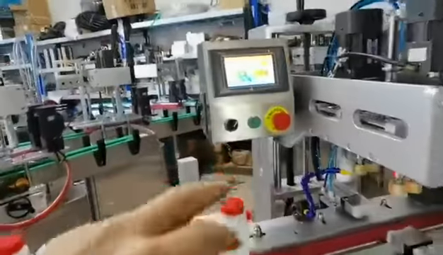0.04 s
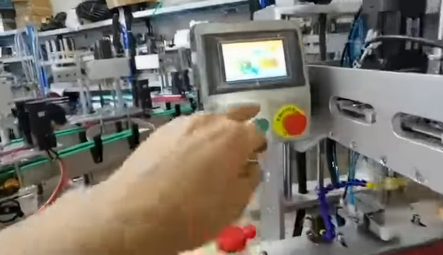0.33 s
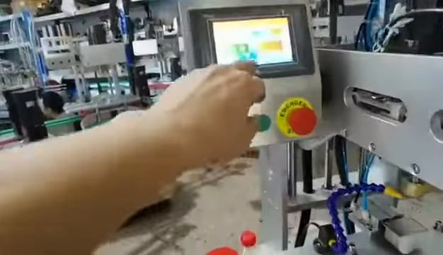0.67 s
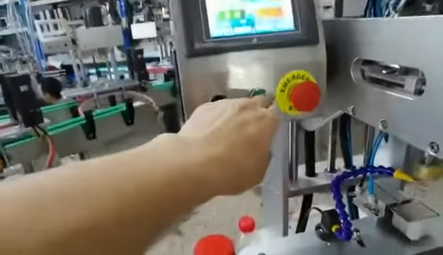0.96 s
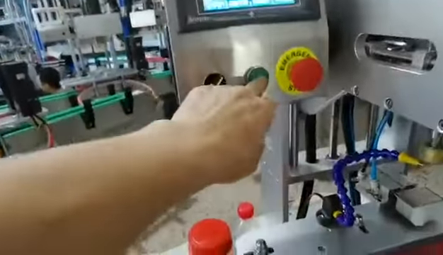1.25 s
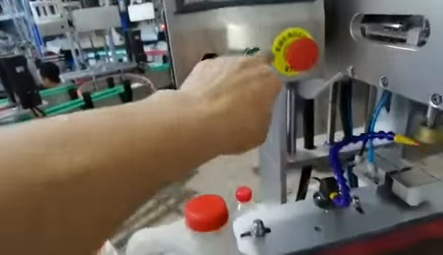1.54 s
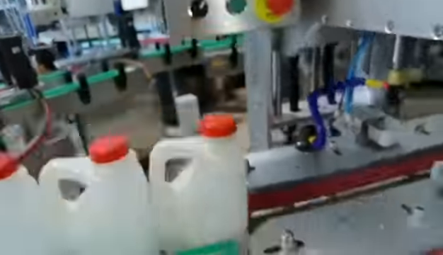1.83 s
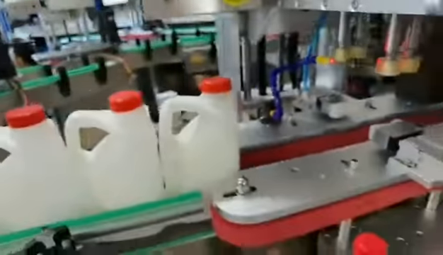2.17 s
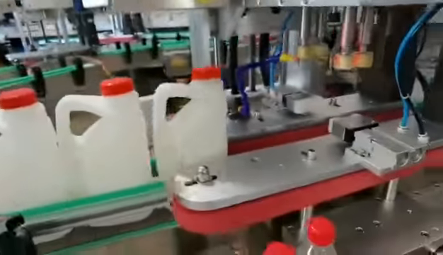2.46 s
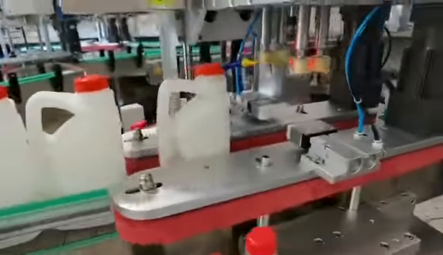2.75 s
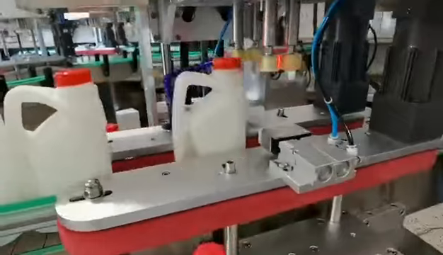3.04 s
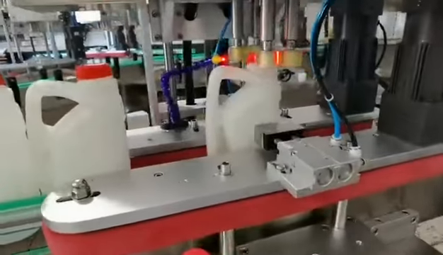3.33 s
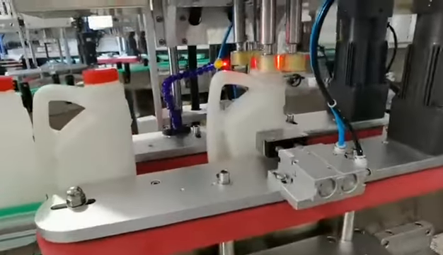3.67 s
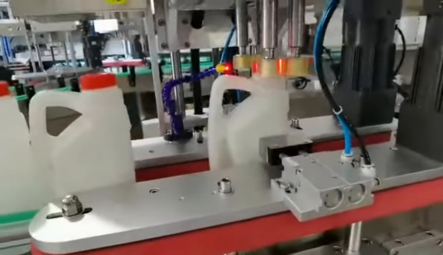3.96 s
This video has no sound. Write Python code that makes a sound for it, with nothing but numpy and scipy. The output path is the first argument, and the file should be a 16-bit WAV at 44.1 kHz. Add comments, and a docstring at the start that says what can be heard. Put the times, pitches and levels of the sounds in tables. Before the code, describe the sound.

A bottle capping machine whirrs and squeals twice, then hisses and clacks in a noisy workshop.

```python
"""Belts whirr and a conveyor rumbles at a bottle capping machine in a noisy workshop.
Twice the capping wheels spin up, ringing and squealing from friction; the drive hums in swells
and hollow bottles jostle. A button and switch clack after the first run. After the second,
air valves hiss, a clamp shuts on a bottle and the capping head clatters down."""
import sys
import numpy as np
from scipy import signal
from scipy.fft import rfft, irfft
from scipy.io import wavfile
from scipy.ndimage import uniform_filter1d

SR = 44100
rng = np.random.default_rng(int(sys.argv[2]) if len(sys.argv) > 2 else 0)


def transcribe(u):
    """Save the signal u as a 16-bit wav file named by the first command-line argument.

    u: samples, shape (n,) or (channels, n), limited to [-1, 1]; the rate is SR.
    q: integer samples, one column per channel.
    """
    v = np.clip(np.atleast_2d(u).T, -1, 1)
    q = np.round(v * 32767).astype(np.int16)
    wavfile.write(sys.argv[1], SR, q)


N = 176400
TIME = np.arange(N) / SR
BINS_HZ = np.fft.rfftfreq(N, 1 / SR)


def wheels():
    """Friction keeps the capping wheels' metal resonances ringing, with two squeals and a whine."""
    # wheel resonances: pitch_hz, half_width_hz, level_db, pan_db
    resonances = [(1810, 28, -7.5, -14.5), (2073, 50, -7.5, 3), (2253, 220, 1, -8), (2640, 200, -10, -3.5),
                  (3137, 42, -12.5, -15), (3730, 67, -11.5, -2.5), (4070, 51, -9.5, -0.5),
                  (4390, 280, -11, -4), (5596, 110, -14.5, -6), (6380, 50, -18.5, 14.5),
                  (7000, 350, -13, 8.5)]
    # envelopes of the ringing and the three tones: time_s, level_db
    ring_level = [(0, -68.5), (.55, -40.5), (.85, -39.5), (1.08, -33), (1.33, -35), (1.44, -33.5),
                  (2.3, -53), (2.55, -36), (2.9, -34.5), (3.14, -34), (3.26, -30), (3.42, -36.5),
                  (3.55, -46)]
    early_level = [(0, -53), (.65, -47.5), (.88, -41), (1.1, -39), (1.3, -51), (1.42, -57), (2.35, -58.5),
                   (2.39, -36.5), (2.7, -41), (3.15, -47), (3.25, -58)]
    late_level = [(.8, -64), (1.05, -42), (1.22, -40), (1.32, -29.5), (1.42, -59), (2.8, -58), (3.02, -49),
                  (3.09, -32), (3.16, -33), (3.3, -56)]
    whine_level = [(.8, -61), (1.1, -50), (1.32, -46), (1.4, -73), (2.6, -66), (2.95, -49), (3.18, -40),
                   (3.25, -62)]
    power = sum((amp(db) * pan(pan_db) * unit(peak(hz, half_width_hz))) ** 2
                for hz, half_width_hz, db, pan_db in resonances)
    rings = noise(np.sqrt(power)) * amp(0.53 * drift(rate_hz=33)) * level(ring_level)
    early = squeal(early_level, pitch_hz=2242, pan_db=-8.5)
    late = squeal(late_level, pitch_hz=2085, pan_db=-11)
    whine = squeal(whine_level, pitch_hz=3687, pan_db=6)
    return rings + early + late + whine


def squeal(envelope, pitch_hz, pan_db):
    """A wheel sticks and slips into one rough tone."""
    phase = 2 * np.pi * np.cumsum(pitch_hz * (1 + 0.00701 * drift(rate_hz=110))) / SR
    return unit(np.sin(phase) * amp(3.3 * drift(rate_hz=30))) * pan(pan_db) * level(envelope)


def mechanism():
    """Button, switch, clamp and capping head are struck in turn."""
    # part modes: pitch_hz, level_db, t60_s, pan_db
    button = [(2560, 1.5, 0.087, -1), (2800, -3, .05, 0), (4940, -14, .05, 3)]
    switch = [(1834, 7, 0.054, -12), (2056, 6, 0.086, -16.5), (2457, 4, 0.055, 1), (3050, -10, 0.071, 3),
              (3800, -8, .05, 1), (6150, -5.5, 0.054, -1), (6750, -5, 0.07, 11)]
    clamp = [(1323, -12, 0.21, 2), (1718, -3, 0.1, -11), (2580, -1.5, 0.4, -2), (2762, -3.5, 0.14, -11),
             (3340, -4, 0.077, 11.5), (3770, -12, 0.37, 7), (5970, -9, 0.064, 4), (6670, -3, 0.047, 4),
             (7030, -9.5, 0.17, 17)]
    head = [(1370, -11.5, 0.18, -13), (1746, 1, 0.04, -7), (2080, 1, 0.058, -25), (2323, -3, 0.091, -17),
            (2480, -8.5, 0.17, -6), (3300, -2.5, 0.072, 11), (3960, -4.5, 0.068, 3), (4404, 2, 0.091, 2),
            (4530, -5, 0.082, 11), (5140, -17, 0.11, 5)]
    # blows: start_s, level_db, crack_relative_db, tilt_db_per_octave
    button_blows = [(1.336, -24, -10, 0.5)]
    switch_blows = [(1.351, -26.5, 3, -0.5), (1.36, -27.5, 5.5, 1), (1.365, -34.5, 9, -1.5)]
    clamp_blows = [(3.273, -22, 4.5, -1), (3.279, -28, 3, -1), (3.296, -37, -6, 5),
                   (3.351, -35.5, -6, -4.5), (3.371, -30, -9, -5)]
    head_blows = [(3.942, -30, 10, -9), (3.948, -35, 9, -4), (3.961, -28.5, -5, -6),
                  (3.971, -20.5, -7, 10.5), (3.981, -25, -4, -3)]
    return (clacks(button, button_blows) + clacks(switch, switch_blows)
            + clacks(clamp, clamp_blows) + clacks(head, head_blows))


def clacks(modes, blows):
    """Each blow cracks and rings the modes of a loose, buzzing part."""
    # crack spectrum: freq_hz, density_db
    crack_spectrum = [(100, -14), (900, -31), (1800, 3.5), (2600, -3), (4000, -2), (7600, -2.5)]
    rise_s, crack_decay_s = 0.002, 0.0032
    buzz_depth, buzz_hz = 0.73, 90
    out, t = np.zeros((2, N)), TIME[:14000]
    centre_hz = np.mean([mode[0] for mode in modes])
    crack_noise = noise(amp(spectrum(crack_spectrum)))
    for k, (start_s, db, crack_db, tilt_db_per_octave) in enumerate(blows):
        crack = crack_noise[:, k * len(t):(k + 1) * len(t)]
        sound = 2 * amp(crack_db) * crack * np.exp(-t / crack_decay_s)
        for hz, mode_db, t60_s, pan_db in modes:
            phase = 2 * np.pi * (hz * t + rng.random((2, 1)))
            ring = np.sin(phase + buzz_depth * drift(buzz_hz, len(t)))
            fade = np.exp(-np.log(1000) * t / t60_s) * (1 + buzz_depth * drift(buzz_hz, len(t)))
            gain = amp(mode_db + tilt_db_per_octave * np.log2(hz / centre_hz))
            sound += gain * pan(pan_db) * ring * fade
        add(out, start_s, amp(db) * sound * np.minimum(t / rise_s, 1))
    return out


def valves():
    """Each valve vents a rush of air with a broad nozzle whistle."""
    # air bursts: start_s, rise_s, hold_s, release_s, rush_db, whistle_db, rush_pan_db
    bursts = [(3.154, 0.039, 0.044, 0.061, -20.5, -33.5, -2.5), (3.246, 0.02, 0.046, 0.12, -28, -42.5, 14),
              (3.858, 0.002, .005, 0.0093, -34, -36, 6), (3.868, 0.0058, .014, 0.098, -29.5, -29.5, -0.5),
              (3.954, 0.013, 0.058, 0.035, -18.5, -36, 22)]
    # air spectra: freq_hz, density_db
    rush_spectrum = [(100, -19), (1200, -12), (2200, -1), (3400, 0.5), (4600, -8.5), (5600, -7), (6100, -4),
                     (6600, -4), (7600, 1)]
    whistle_spectrum = [(100, -40), (3400, -29), (4000, -12), (4400, -2.5), (5200, -3), (5700, -12.5),
                        (7600, -28.5)]
    rush = noise(amp(spectrum(rush_spectrum)))
    whistle = noise(amp(spectrum(whistle_spectrum))) * pan(db=-6)
    out, t = np.zeros((2, N)), TIME[:SR // 2]
    for start_s, rise_s, hold_s, release_s, rush_db, whistle_db, rush_pan_db in bursts:
        envelope = np.minimum(t / rise_s, 1) * np.exp(-np.maximum(t - hold_s, 0) / release_s)
        opening = np.zeros((1, N))
        add(opening, start_s, envelope[None])
        out += opening * (amp(rush_db) * pan(rush_pan_db) * rush + amp(whistle_db) * whistle)
    return out * amp(0.57 * drift(rate_hz=63))


def cylinders(pitch_hz=105, decay_s=0.028):
    """Air cylinders jolt the frame with dull thuds."""
    # thuds: start_s, level_db
    thuds = [(3.873, -36), (3.978, -30)]
    out, t = np.zeros((2, N)), TIME[:SR // 2]
    thud = np.sin(2 * np.pi * pitch_hz * t) * np.exp(-t / decay_s)
    for start_s, db in thuds:
        add(out, start_s, amp(db) * thud[None])
    return out


def conveyor(knocks_per_s=260, knock_power_share=0.24):
    """Chain links and bottles knock densely over a rolling rumble."""
    # rumble spectrum: freq_hz, density_db
    rumble_spectrum = [(25, -16), (42, 3), (70, -7), (100, 3), (200, 3.5), (450, 1), (750, 3), (1050, -2),
                       (1400, -19), (3000, -28), (7000, -35.5)]
    # rumble envelope: time_s, level_db
    envelope = [(0, -51), (.35, -39.5), (1.0, -43), (1.3, -39.5), (1.62, -30), (1.98, -32), (2.08, -29.5),
                (2.3, -34), (2.49, -30), (2.72, -35), (2.93, -30), (3.05, -32.5), (3.15, -34),
                (3.27, -31.5), (3.36, -36.5), (3.44, -34.5), (3.53, -42), (3.85, -42), (4, -36.5)]
    onsets = rng.random(N) < knocks_per_s / SR
    knocks = onsets * amp(np.minimum(rng.exponential(1, N), 3))
    shape = amp(spectrum(rumble_spectrum))
    rattle = np.sqrt(knock_power_share) * colour(knocks * rng.choice([-1, 1], (2, N)), shape)
    rumble = np.sqrt(1 - knock_power_share) * noise(shape)
    return patchy(rattle + rumble, depth_db=0.5) * level(envelope)


def bottles():
    """Empty bottles boom at their hollow resonance and shake the frame."""
    # bottle jostles: centre_s, half_length_s, resonance_hz, level_db
    jostles = [(0.682, 0.039, 216, -37), (0.891, 0.018, 248, -43.5), (1.266, 0.082, 265, -41),
               (1.765, 0.042, 312, -37), (2.089, 0.016, 265, -33.5), (2.093, 0.03, 745, -35.5),
               (2.477, 0.055, 423, -30.5), (2.565, 0.035, 308, -31.5), (2.932, 0.11, 438, -36),
               (3.04, 0.047, 610, -35.5), (3.154, 0.021, 392, -30), (3.313, 0.0083, 352, -29),
               (3.357, 0.021, 335, -30.5), (3.415, 0.045, 490, -32.5)]
    # frame shudders: centre_s, half_length_s, level_db
    shudders = [(0.351, .08, -44.5), (0.611, 0.084, -40.5), (.95, .04, -43), (1.62, 0.057, -43),
                (1.865, .03, -34.5), (2.443, 0.034, -41), (2.598, 0.044, -37), (2.961, 0.063, -40),
                (3.102, 0.078, -40.5)]
    out, lead_s = np.zeros((2, N)), TIME[:SR // 2].mean()
    for centre_s, half_s, hz, db in jostles:
        add(out, centre_s - lead_s, amp(db) * boom(half_s, hz, width_hz=155))
    for centre_s, half_s, db in shudders:
        add(out, centre_s - lead_s, amp(db) * boom(half_s, hz=91.7, width_hz=26))
    return out


def boom(half_s, hz, width_hz):
    """A swell of irregular shaking in one low resonance, centred in half a second."""
    t = TIME[:SR // 2]
    shared, left, right = rng.standard_normal((3, len(t)))
    shaking = shared + hz / 1000 * np.array([left, right])  # wider stereo at higher pitch
    band = signal.butter(2, [hz - width_hz / 2, hz + width_hz / 2], "bandpass", fs=SR, output="sos")
    swell = np.exp(-((t - t.mean()) / half_s) ** 2)
    return unit(signal.sosfilt(band, shaking) * swell) * np.sqrt(np.mean(swell ** 2))


def drive(pitch_hz=140.8, third_db=-15.5, mains_hz=51.2, mains_rms_db=-54):
    """The drive's wavering hum swells and sinks over steady mains hum."""
    # hum swells: centre_s, half_length_s, level_db
    hum_swells = [(0.377, 0.16, -47), (0.67, 0.084, -37.5), (0.917, 0.073, -31), (1.292, 0.1, -31.5),
                  (2.192, 0.056, -36.5), (2.554, 0.068, -33), (2.77, 0.056, -35), (2.89, 0.073, -37)]
    phase = 2 * np.pi * np.cumsum(pitch_hz * (1 + 0.023 * drift(rate_hz=12.4))) / SR
    tone = np.sin(phase) + amp(third_db) * np.sin(3 * phase)
    hum = tone * swells(hum_swells) * amp(2.7 * drift(rate_hz=100))
    mains = amp(mains_rms_db) * np.sin(2 * np.pi * mains_hz * TIME)
    return np.sqrt(2) * (hum + mains)


def belts():
    """Side belts whirr on the right, quieter once the clamp shuts."""
    # whirr spectrum: freq_hz, density_db
    whirr_spectrum = [(300, -26.5), (900, -13), (1250, -11), (1550, 2.5), (1780, 3), (2000, -3.5),
                      (2600, -12), (3200, -22), (4200, -18), (5200, -32.5), (7500, -34)]
    # whirr envelope: time_s, level_db
    envelope = [(0, -37), (.11, -32.5), (.22, -36.5), (.8, -34.5), (1.3, -35.5), (1.55, -37), (1.85, -35),
                (2.46, -35.5), (2.8, -37), (3.15, -38), (3.4, -41.5)]
    whirr = noise(amp(spectrum(whirr_spectrum)))
    return whirr * level(envelope) * pan(db=-11.5) * amp(1.2 * drift(rate_hz=50))


def puffs():
    """Distant air hisses thinly on the left as the wheels start."""
    # air puffs: centre_s, half_length_s, level_db
    hiss_swells = [(0.676, 0.22, -46.5), (2.638, 0.072, -42.5)]
    return swells(hiss_swells) * pan(db=16) * noise(peak(hz=6990, half_width_hz=180))


def workshop():
    """The wash of many machines, fluttering slightly."""
    # wash spectrum: freq_hz, density_db
    wash_spectrum = [(20, -28), (45, -15.5), (75, -8), (130, 5.5), (250, 1), (600, 1.5), (1000, 1.5),
                     (1300, 1.5), (1780, -2), (2050, -2.5), (2450, -1), (2900, -5), (3600, -10),
                     (4500, -10.5), (5000, -8.5), (5250, -16.5), (6000, -16), (7100, -11.5), (7600, -12.5)]
    # stereo balance: freq_hz, pan_db
    balance = [(100, 1), (400, 1.5), (800, 1.5), (1200, 0), (1750, 1), (2500, -6), (3300, 1.5), (4800, -2),
               (5600, -1), (6800, 15), (7600, 15.5)]
    # wash envelope: time_s, level_db
    envelope = [(0, -32), (.6, -33.5), (1.2, -30.5), (2.0, -32), (3.1, -30.5), (3.45, -34.5), (4, -35)]
    wash = noise(amp(spectrum(wash_spectrum)) * pan(spectrum(balance)))
    return patchy(wash, depth_db=2.5) * level(envelope) * amp(0.5 * drift(rate_hz=17))


def dips(fall_s=0.025):
    """Gain of the running noise: three brief dips."""
    # level dips: start_s, hold_s, depth_db, recovery_s
    drops = [(1.351, 0.039, 10, 0.17), (3.18, 0.067, 8.5, 0.045), (3.87, 0.056, 9, 0.025)]
    cut_db = np.zeros(N)
    for start_s, hold_s, depth_db, recovery_s in drops:
        fall = np.clip((TIME - start_s) / fall_s, 0, 1)
        cut_db += depth_db * fall * np.exp(-np.maximum(TIME - start_s - hold_s, 0) / recovery_s)
    return amp(-cut_db)


def room(x, t60_s=0.3, wet_db=-5):
    """Adds dense reflections from the machine frame and walls."""
    t = TIME[:SR // 2]
    taps = rng.standard_normal((2, len(t))) * (rng.random((2, len(t))) < .05) * (t > .002)
    tail = taps * np.exp(-np.log(1000) * t / t60_s)
    return x + amp(wet_db) * signal.fftconvolve(x, tail / np.linalg.norm(tail[0]), axes=1)[:, :N]


def amp(db):
    """Decibels to gain."""
    return 10 ** (np.asarray(db) / 20)


def unit(x):
    """Scales to rms 1."""
    return x / np.sqrt(np.mean(x ** 2) + 1e-20)


def spectrum(points):
    """Interpolates a table on a log-frequency axis."""
    hz, value = np.transpose(points)
    return np.interp(np.log(BINS_HZ + 1), np.log(hz + 1), value)


def peak(hz, half_width_hz):
    """Gain over frequency of one resonance."""
    return 1 / (1 + ((BINS_HZ - hz) / half_width_hz) ** 2)


def level(points):
    """Gain over time from a dB envelope."""
    return amp(np.interp(TIME, *np.transpose(points)))


def swells(rows):
    """Gain over time from Gaussian swells."""
    return sum(amp(db) * np.exp(-((TIME - centre_s) / half_s) ** 2) for centre_s, half_s, db in rows)


def pan(db):
    """Constant-power stereo gains; db is left minus right."""
    sides = amp(np.array([[.5], [-.5]]) * db)
    return sides / np.sqrt(np.mean(sides ** 2, 0))


def drift(rate_hz, size=N):
    """Random wander of about rms 1."""
    hz = np.fft.rfftfreq(4096, 1 / 1000)
    slow = unit(irfft(rfft(rng.standard_normal(4096)) * np.exp(-(hz / rate_hz) ** 2)))
    return np.interp(TIME[:size], np.arange(len(slow)) / 1000, slow)


def colour(pair, gain):
    """Filters two unrelated signals into stereo that is alike in the bass."""
    # left-right likeness: freq_hz, correlation
    likeness = [(45, .98), (80, .96), (160, .985), (300, .9), (600, .42), (1100, .05), (1800, -.12),
                (3000, .1), (5000, .1), (7500, 0)]
    correlation = spectrum(likeness)
    left, other = rfft(pair)
    right = correlation * left + np.sqrt(1 - correlation ** 2) * other
    return unit(irfft(np.array([left, right]) * gain, N))


def noise(gain):
    """Stereo noise of rms 1 with the given spectrum."""
    return colour(rng.standard_normal((2, N)), gain)


def patchy(x, depth_db):
    """Lets patches of the spectrum come and go."""
    frames = signal.stft(x, nperseg=512)[2]
    patches = rng.standard_normal(frames.shape[1:])
    for axis in (0, 1):
        patches = uniform_filter1d(patches, size=6, axis=axis)
    return unit(signal.istft(frames * amp(depth_db * unit(patches)))[1][:, :N])


def add(mix, start_s, sound):
    """Mixes a sound in at start_s."""
    part = mix[:, round(start_s * SR):][:, :sound.shape[1]]
    part += sound[:, :part.shape[1]]


def scene():
    """Dipping running noise, air, and impacts with reflections."""
    running = workshop() + belts() + conveyor() + bottles() + drive() + wheels()
    impacts = mechanism() + cylinders()
    return running * dips() + valves() + puffs() + room(impacts)


def record(dry):
    """Steep low-pass and very short fades at both ends."""
    cutoff_hz, fade_s = 7540, 0.001
    lowpass = signal.firwin(1023, cutoff_hz, window=("kaiser", 8), fs=SR)
    fade = np.minimum(np.minimum(TIME, TIME[-1] - TIME) / fade_s, 1)
    return signal.oaconvolve(dry, lowpass[None], "same") * fade


dry = scene()
out = record(dry)
transcribe(out)
```